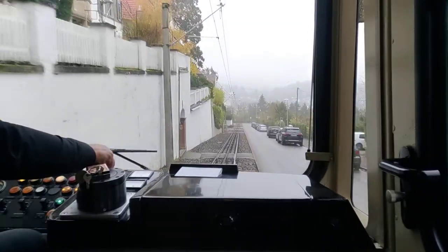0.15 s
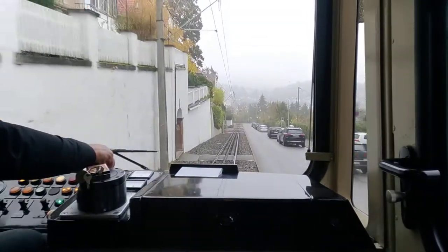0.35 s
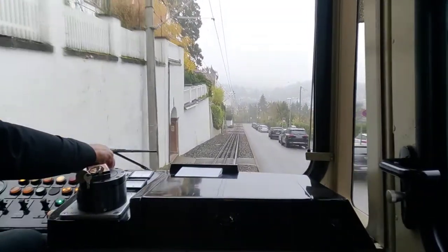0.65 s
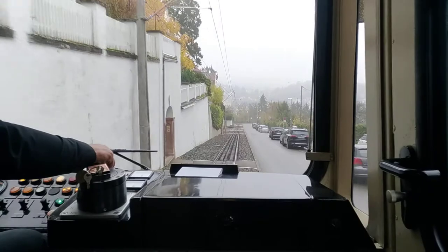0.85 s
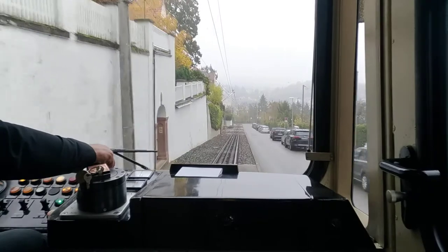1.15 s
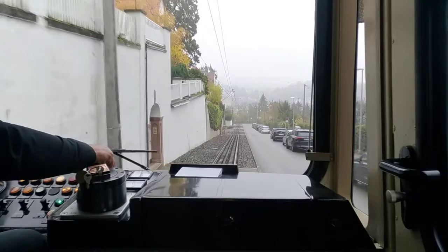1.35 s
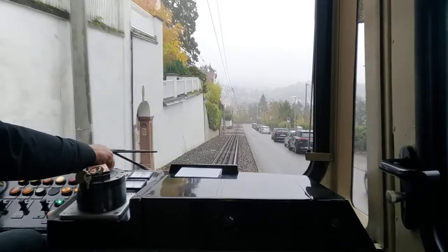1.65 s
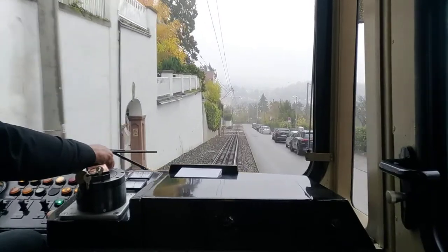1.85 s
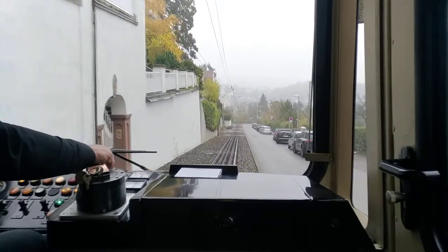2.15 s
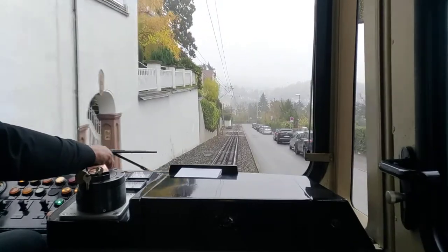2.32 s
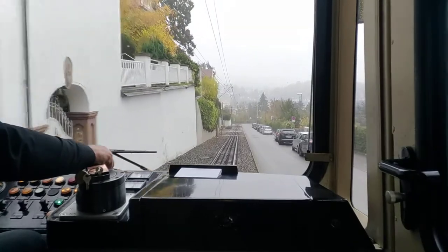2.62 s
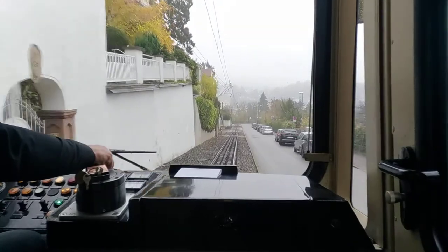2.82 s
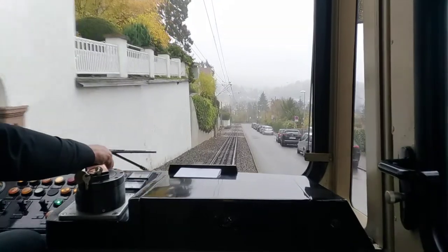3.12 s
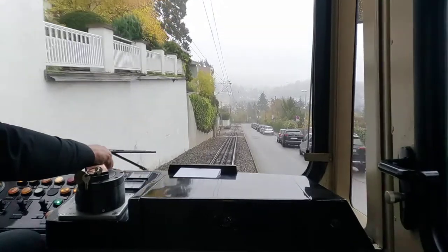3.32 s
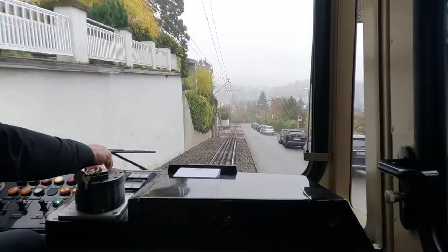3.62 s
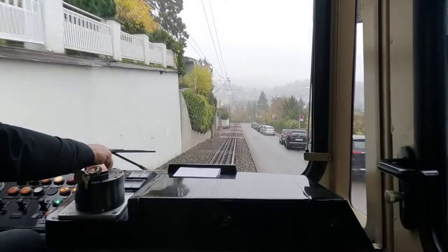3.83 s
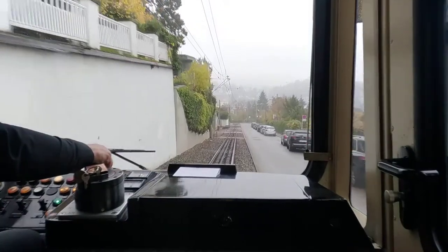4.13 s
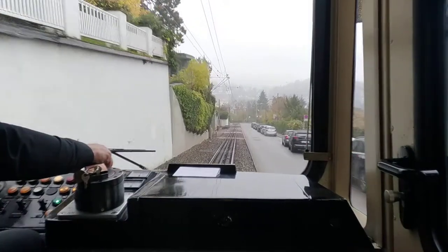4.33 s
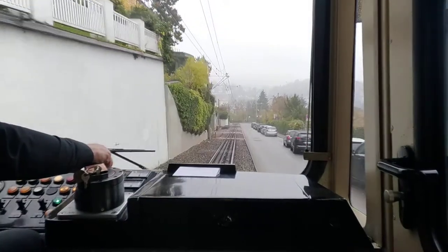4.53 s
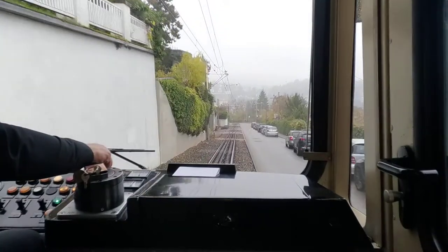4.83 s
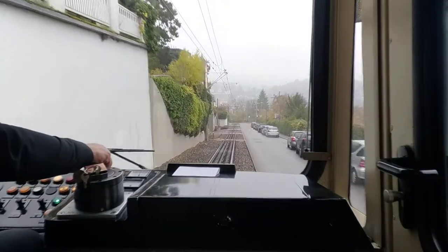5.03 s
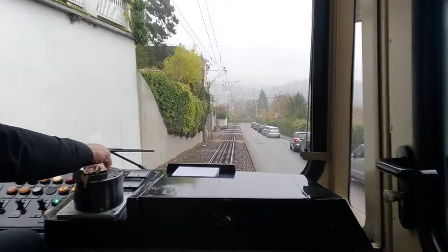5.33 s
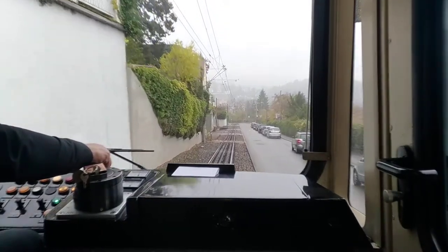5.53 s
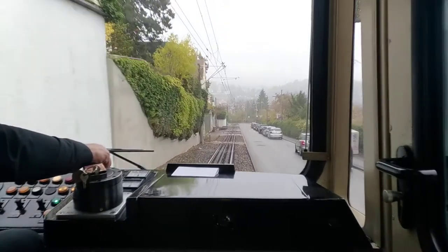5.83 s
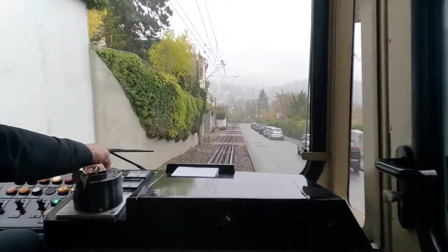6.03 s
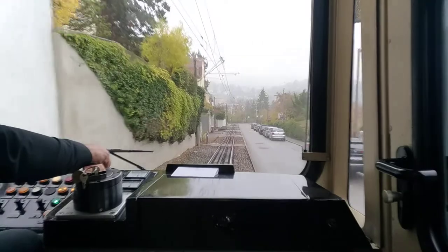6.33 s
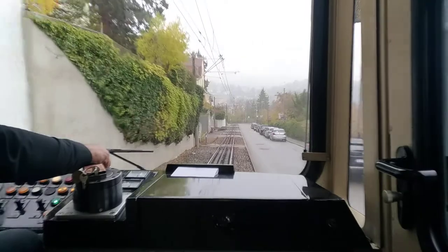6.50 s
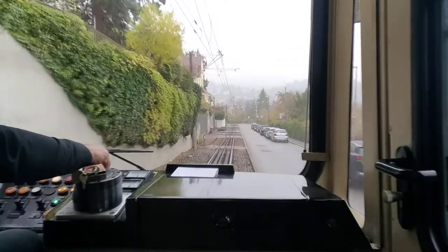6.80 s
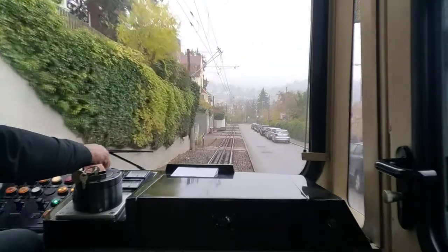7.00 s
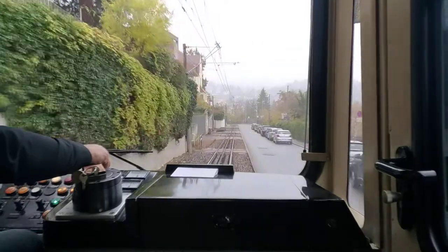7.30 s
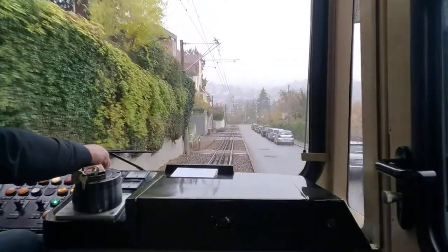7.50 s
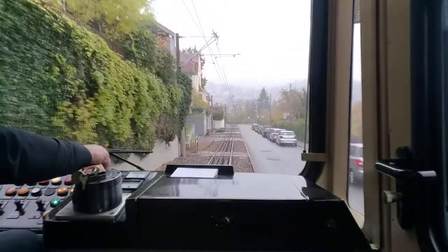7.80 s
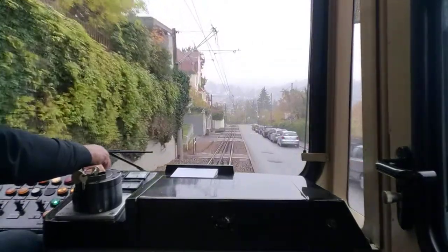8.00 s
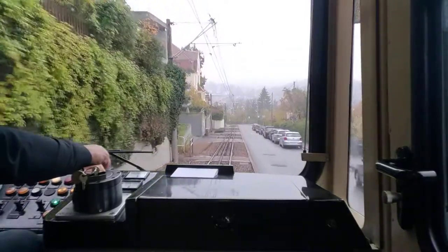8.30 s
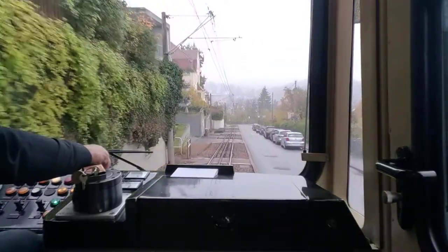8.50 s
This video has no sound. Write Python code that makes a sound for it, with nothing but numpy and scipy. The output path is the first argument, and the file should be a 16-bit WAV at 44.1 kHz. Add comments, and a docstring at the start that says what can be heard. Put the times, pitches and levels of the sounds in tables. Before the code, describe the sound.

From the start to the end, about eight and a half seconds, a rack railcar rolls at steady speed, heard from inside the driver's cab. Up front is a deep drone from the cogwheel drumming on the rack, together with a mid-pitched gear whine that keeps nearly the same pitch but wavers in loudness, with raspy, quickly throbbing overtones. The whine swells briefly around 1.2, 2.6, 4.4 and 5.6 seconds. Behind these, the cab panels hum, the floor rumbles and the track hisses faintly. Bumps make the low rumble swell for an instant near 3, 4.4, 5.2, 8 and 8.5 seconds. A flurry of light, dry, high clicks comes at about 5.8 to 6.1 seconds, and a shorter one at 7 seconds. The drone and whine continue to the end without slowing.

```python
"""A deep drone and a wavering gear whine fill the cab of a rack railcar rolling steadily downhill.
The drone is the cogwheel's teeth drumming on the rack. The whine is two gear stages, with sidebands
and throbbing overtones from their uneven wheels. Behind them the panels hum, the floor rumbles and
swells over bumps, and the track hisses past the windows. Late on come two flurries of dry clicks."""
import sys
import numpy as np
from scipy import signal
from scipy.fft import rfft, irfft, next_fast_len
from scipy.io import wavfile
from scipy.ndimage import uniform_filter1d, map_coordinates

SR = 44100
rng = np.random.default_rng(int(sys.argv[2]) if len(sys.argv) > 2 else 0)


def dump(signal):
    """Clip the signal to [-1, 1] and save it as 16-bit WAV at the path in sys.argv[1]."""
    limited = np.clip(np.atleast_2d(signal).T, -1, 1)
    pcm = np.round(limited * 32767).astype(np.int16)
    wavfile.write(sys.argv[1], SR, pcm)


N = 381553

# EQ shapes of the noise beds, levels relative: freq_hz, left_db, right_db
RUMBLE_EQ = [(60, -84, -89), (82, -59.5, -55), (95, -51.5, -50), (104, -45.5, -45.5), (114, -46.5, -47.5),
             (126.5, -41, -39.5), (139, -43.5, -44), (148, -49, -50.5), (169, -54.5, -53.5),
             (197, -59.5, -57), (257, -60.5, -57.5), (378, -68.5, -66.5), (700, -120, -120)]
THUD_EQ = [(20, -69, -70), (32.8, -54, -52), (45.2, -51, -53), (57.5, -34.5, -31.5), (73.4, -39, -39),
           (91.5, -40.5, -39.5), (131, -96.5, -101)]
ROAR_EQ = [(120, -120, -120), (199, -64.5, -68.5), (363, -62, -62), (610, -65.5, -64.5),
           (706, -63.5, -62.5), (731, -69, -62.5), (803, -58.5, -55.5), (858, -61, -56.5),
           (900, -64.5, -62), (925, -65, -60), (1000, -71.5, -67), (1130, -69, -67), (1190, -72, -68),
           (1350, -70, -68), (1590, -71.5, -67.5), (1710, -76.5, -74.5), (1790, -76, -73), (2204, -93, -90),
           (4030, -120, -120)]
HISS_EQ = [(1190, -120, -120), (2040, -79, -82.5), (2500, -81.5, -81.5), (2960, -83.5, -89),
           (3580, -83.5, -86), (3980, -86, -91), (4700, -89, -83.5), (5070, -89.5, -88.5),
           (6100, -92, -87.5), (7050, -94, -89), (8200, -94.5, -86.5), (8800, -100, -93.5),
           (9560, -106, -106), (11000, -130, -130)]
AIR_EQ = [(7000, -130, -130), (8900, -103, -110), (9700, -104, -109), (11400, -103, -109),
          (12000, -110, -112), (12800, -116, -116)]
# how alike the two sides of a bed are: freq_hz, correlation
STEREO_LIKENESS = [(60, 0.98), (150, 1), (240, 0.92), (370, 0.51), (590, 0.81), (930, 0.16), (1470, -0.75),
                   (2300, 0.34), (3600, -0.056)]
# track noise, higher beside bare walls: time_s, hiss_db, air_db
TRACK_FADERS = [(0.0, -44.5, -72), (.15, -45, -72), (.4, -46, -75), (1.4, -46.5, -72), (1.64, -49, -81),
                (1.82, -49.5, -78), (1.92, -47.5, -65), (2.25, -48, -71), (2.6, -47.5, -78),
                (2.9, -49, -75), (3.1, -47, -69), (3.36, -49.5, -78), (3.48, -47, -64), (3.75, -46.5, -65),
                (3.9, -47, -73), (4.2, -48.5, -72), (4.33, -46.5, -70), (4.5, -46, -72), (4.75, -48.5, -74),
                (5.2, -47.5, -77), (5.55, -49.5, -74), (5.88, -46.5, -66), (6.22, -49, -75),
                (6.5, -47.5, -72), (6.8, -49.5, -75), (7.05, -47.5, -69), (7.32, -49.5, -80),
                (7.8, -48, -70), (8.2, -49, -74), (8.64, -49, -72)]
# low thud of the body: time_s, level_db
THUD_FADER = [(0, -36.5), (.9, -32.5), (1.9, -36), (2.75, -33.5), (3.3, -34.5), (4.2, -36), (4.85, -38),
              (5.13, -31), (5.7, -37.5), (6, -34.5), (6.9, -37.5), (7.5, -32.5), (7.9, -42), (8.1, -36),
              (8.65, -44)]
# rumble swelling as the cogwheel turns: swells_per_turn, depth_db, phase_rad
COG_SWELLS = [(1, 0.3, -3), (2, 2.5, 3), (3, 0.3, 0), (4, 0.5, -0.1)]
# bumps in the track: time_s, swell_db
TRACK_BUMPS = [(.12, 0.5), (1.81, 4), (3.08, 7), (3.97, 4.5), (4.41, 7.5), (5.23, 10), (5.67, 1.5),
               (6.94, 1), (8.0, 6), (8.05, 6), (8.56, 13)]
# steady cab hums: pitch_hz, left_db, right_db, left_lead_rad
CAB_HUMS = [(68.3, -50, -51.5, 0.003), (121.6, -42, -38, 0.0016), (129.5, -36, -35.5, 0.0017),
            (183, -47, -46.5, 0.0033), (250.3, -46, -41, 0.0032), (464.6, -47, -52, 0.1),
            (691, -48.5, -58, 0.1), (1405, -61.5, -60.5, 0.1), (1597, -50.5, -57.5, 0.1)]
# dry clicks: start_s, left_db, right_db
CLICKS = [(5.8384, -44, -34), (5.8462, -36, -43), (5.8522, -34, -42), (5.9012, -39, -42),
          (5.9570, -40, -46), (6.0125, -37, -44), (6.0195, -38, -43), (6.0555, -34, -46),
          (6.9770, -39, -43), (7.0240, -38, -39), (7.0318, -36, -41), (7.0378, -33, -37)]

# pitch of the main gear mesh: time_s, pitch_hz
MESH_PITCH = [(0, 815.6), (.25, 816.5), (.7, 814.8), (2.75, 814.7), (3.05, 813.3), (3.9, 814.5),
              (5.4, 813.9), (5.68, 812.2), (6.0, 814.2), (6.6, 814.4), (7.0, 812.4), (8.15, 815.1),
              (8.65, 814)]
# main mesh and its second harmonic: time_s, left_db, right_db, second_db
MESH_FADERS = [(0.04, -33, -32, -42), (0.2, -31, -42, -41), (0.36, -27.5, -40, -37.5),
               (0.52, -30, -30, -42.5), (0.68, -30.5, -46, -44.5), (0.84, -30.5, -31, -47),
               (1.0, -41, -32.5, -45.5), (1.16, -29, -19, -45), (1.32, -57, -37.5, -40),
               (1.48, -27.5, -28.5, -45), (1.64, -31, -29.5, -49.5), (1.8, -31, -30, -50),
               (1.96, -29, -31.5, -41.5), (2.12, -27, -30, -54), (2.28, -27.5, -31, -47.5),
               (2.44, -30.5, -32, -42.5), (2.6, -25, -24, -47.5), (2.76, -29, -38, -53.5),
               (2.92, -29.5, -32.5, -44), (3.08, -33, -34, -42), (3.24, -30, -30, -51),
               (3.4, -31.5, -29.5, -56.5), (3.56, -34, -32, -48), (3.72, -31, -32, -53.5),
               (3.88, -27, -29, -48), (4.04, -43, -54, -45), (4.2, -30.5, -30, -45),
               (4.36, -28, -23.5, -39.5), (4.52, -37, -42, -50.5), (4.68, -39, -25.5, -46),
               (4.84, -34, -34, -41), (5.0, -35, -35, -45.5), (5.16, -31, -34, -47.5),
               (5.32, -41, -46, -51.5), (5.48, -38, -40, -46.5), (5.64, -26.5, -24, -38.5),
               (5.8, -36, -35, -44), (5.96, -42, -42, -46.5), (6.12, -34, -34.0, -49.5),
               (6.28, -28, -24.5, -45.5), (6.44, -30, -28, -47.5), (6.6, -31, -27.5, -51.5),
               (6.76, -39, -36, -58), (6.92, -32, -29.5, -41), (7.08, -29, -27.5, -42),
               (7.24, -37, -37, -54), (7.4, -31, -34, -41.5), (7.56, -33, -31, -52), (7.72, -34, -29, -47),
               (7.88, -41, -29, -42), (8.04, -31, -30.5, -45.5), (8.2, -36, -33.5, -45),
               (8.36, -27, -29.5, -45), (8.52, -42, -30, -52)]
# stereo phase of the whine: time_s, left_lead_rad
MESH_LEAD = [(0, -0.9), (.8, 0.28), (1.6, -0.089), (5.15, 0.067), (5.4, 1.5), (8.65, 1.23)]
# sidebands around the mesh: offset_hz, left_db, right_db, left_lead_rad
MESH_SIDEBANDS = [(-161.4, -54, -48, 2.6), (-142.5, -53, -45, 0.5), (-111, -59.5, -43.5, 1.5),
                  (-71.5, -53.5, -60, 0.5), (-53.5, -46, -54, 1.5), (-37.5, -41.5, -48.5, 1.2),
                  (-20, -46.5, -42.5, 4.5), (-10, -46, -36.5, 0.3), (11.5, -42, -37.5, 3),
                  (34, -52.5, -46, -1.5), (52, -57, -42, 0), (77, -49, -54.5, -1.3),
                  (110, -51.5, -41.5, -0.5), (143, -47, -47.5, -0.4), (41.5, -43.5, -51.5, -0.3)]
# small gear's partials: harmonic, left_db, right_db, left_lead_rad
SMALL_GEAR_PARTIALS = [(1, -31, -34.5, 1.2), (2, -45, -51.5, 4), (3, -45.5, -45.5, 0), (4, -45, -45.5, 1),
                       (5, -55, -41, 1.5), (6, -45, -52.5, -0.5), (7, -56, -55.5, -1),
                       (8, -56, -55.5, -1.5), (9, -52.5, -46.5, 4), (10, -61, -57, -11)]
# mesh overtones, levels relative: harmonic, tone_left_db, tone_right_db, rasp_left_db, rasp_right_db
MESH_OVERTONES = [(2, -10.5, -12, -6.5, -2.5), (3, -18.5, -20.5, -16.5, -16.5), (4, -30, -29.5, -26, -23.5),
                  (5, -31, -40, -31, -27), (6, -38, -32, -31, -29), (7, -44.5, -43, -32.5, -26.5),
                  (8, -45.5, -35, -30.5, -29.5)]
# contours that swell two overtones about their mean: time_s, third_db, fourth_db
OVERTONE_CONTOURS = [(0.049, -58.5, -65), (0.35, -60, -64), (0.65, -57.5, -67.5), (0.95, -60, -63),
                     (1.25, -55.5, -61.5), (1.55, -57, -66.5), (1.85, -59, -67), (2.15, -58, -71),
                     (2.45, -61, -65.5), (2.751, -59, -68.5), (3.05, -60.5, -65.5), (3.35, -60.5, -66),
                     (3.65, -61, -70), (3.95, -57, -69), (4.25, -57, -60.5), (4.55, -60.5, -66),
                     (4.85, -56, -65.5), (5.15, -59.5, -64), (5.45, -59, -66), (5.75, -59.5, -65),
                     (6.05, -57, -67), (6.35, -57.5, -66.5), (6.65, -57, -67), (6.95, -57.5, -66),
                     (7.25, -57, -65.5), (7.549, -58.5, -64.5), (7.85, -59, -67), (8.15, -59.5, -66.5),
                     (8.45, -59.5, -66.5)]

# cab boom on the third harmonic of the rack teeth: time_s, level_db
DRONE_FADER = [(0.0, -20), (0.88, -22.5), (1.72, -22.5), (1.88, -27.5), (2.12, -22), (2.88, -23.5),
               (3.0, -22), (3.6, -20), (3.76, -22.5), (4.04, -19.5), (4.16, -24.5), (4.64, -22.5),
               (4.96, -27), (5.32, -23), (6.04, -22.5), (6.28, -26), (6.48, -23), (8.64, -21)]
# low tooth harmonics and the mesh-plus-drone sum tone: time_s, first_db, second_db, fourth_db, sum_db
TOOTH_FADERS = [(0.1, -41, -28.5, -36, -51), (0.45, -35, -30, -53, -49), (0.8, -40, -36, -38.5, -47.5),
                (1.15, -48, -38, -32.5, -36.5), (1.5, -35, -29, -44, -50), (1.85, -50, -35, -37, -45.5),
                (2.2, -35, -38, -43, -43.5), (2.55, -41, -35, -40.5, -49), (2.9, -42, -33.5, -40, -46),
                (3.25, -41, -39, -45, -47), (3.6, -40, -32, -41, -47), (3.95, -35, -30.5, -47, -45),
                (4.3, -37, -38, -41, -55), (4.65, -43, -26.5, -52, -53), (5.0, -38, -40, -56, -54),
                (5.35, -37, -28, -46, -57), (5.7, -37, -36.5, -41.5, -48.5), (6.05, -37, -28, -35, -48),
                (6.4, -34, -38, -57, -44), (6.75, -34, -31, -48, -54.5), (7.1, -40, -42, -42, -42),
                (7.45, -33, -27, -41, -47.5), (7.8, -41, -33, -39, -48), (8.15, -31, -28, -44, -52),
                (8.5, -38, -30.5, -46, -51.5)]
# placing of the low tooth harmonics: harmonic, left_minus_right_db, left_lead_rad
LOW_TOOTH_PANS = [(1, -1.5, -0.49), (2, -1.5, 0.074), (4, 0, -0.067)]
# high tooth partials: harmonic, left_db, right_db, left_lead_rad
HIGH_TOOTH_PARTIALS = [(5, -48, -45, -1.6), (6, -51.5, -43, -0.94)]

MESH_HZ, RASP_HZ, DRONE_HZ = 814, 811.5, 161.18  # at cruising speed
SMALL_TEETH, BIG_TEETH, COG_TEETH = 14, 80, 23
RUMBLE_DB, ROAR_DB, OVERTONE_DB = -28, -30.5, -36  # base levels, before swells
ROAR_FOLLOWS, OVERTONE_FOLLOWS = 0.6, 0.37  # dB for each dB of hiss


def amp(db):
    """Decibels to gain."""
    return 10 ** (np.asarray(db) / 20)


def unit(x):
    """Normalise to rms 1."""
    return x / np.sqrt(np.mean(np.abs(x) ** 2) + 1e-20)


def along(points, hz):
    """Each column after the frequency, read on a log axis."""
    freqs, *cols = np.transpose(points)
    return np.array([np.interp(np.log(hz + 1), np.log(freqs + 1), c) for c in cols])


def curves(rows):
    """One value per sample for each column after the time."""
    times, *cols = np.transpose(rows)
    return [np.interp(np.arange(N) / SR, times, c) for c in cols]


def wobble(rate):
    """A random drift, rate knots a second."""
    knots = rng.standard_normal(int(N * rate / SR) + 4)
    return map_coordinates(knots, [np.arange(N) * rate / SR], order=1)


def phase_of(hz):
    """Phase in radians of a moving pitch."""
    return 2 * np.pi * np.cumsum(hz) / SR


def filtered(x, response):
    """EQ x with a gain given as a function of frequency."""
    size = next_fast_len(N + 8192)
    return irfft(rfft(x, size) * response(np.fft.rfftfreq(size, 1 / SR)), size)[..., :N]


def tone(phase, left_db, right_db, lead, rough, rate):
    """A stereo tone, left ahead by lead radians; its rough share smears into noise about rate Hz wide."""
    smear = np.sqrt(rough * 0.53) * (wobble(rate) + 1j * wobble(rate))
    wave = (np.sqrt(1 - rough) + smear) * np.exp(1j * (phase + rng.uniform(0, 2 * np.pi)))
    left = (wave * np.exp(1j * lead)).real
    return np.sqrt(2) * np.array([amp(left_db) * left, amp(right_db) * wave.real])


def noise_bed(eq, patchy_db):
    """Stereo noise of rms 1 with patches of random gain; the bass sits in the centre."""
    def mid_side_gains(hz):
        angle = np.arccos(along(STEREO_LIKENESS, hz)[0]) / 2
        return np.array([np.cos(angle), np.sin(angle)])

    grains = signal.stft(rng.standard_normal((2, N)), nperseg=1024)[2]
    patches = uniform_filter1d(uniform_filter1d(rng.standard_normal(grains.shape[1:]), 8, 0), 8, 1)
    pair = signal.istft(grains * amp(patchy_db * unit(patches)), nperseg=1024)[1][:, :N]
    mid, side = filtered(pair, mid_side_gains)
    return unit(filtered(np.array([mid + side, mid - side]), lambda hz: amp(along(eq, hz))))


def tooth_phase():
    """Phase of the teeth meeting the rack, in step with the gears."""
    hz, = curves(MESH_PITCH)
    return phase_of(DRONE_HZ * hz / hz.mean()) / 3


def track_hiss():
    """The track hisses past, fluttering at the shaft rate, with patchy air on top."""
    hiss_db, air_db = curves(TRACK_FADERS)
    flutter_db = 0.25 * np.sin(2 * np.pi * MESH_HZ / BIG_TEETH * np.arange(N) / SR)
    hiss = amp(hiss_db + flutter_db + 0.27 * wobble(12)) * noise_bed(HISS_EQ, patchy_db=1.08)
    air = amp(air_db + 1.5 * wobble(9)) * noise_bed(AIR_EQ, patchy_db=4.0)
    return hiss + air


def clicks(pitch_hz=(5200, 8300), width_hz=1100, rise_s=0.00015, top_hz=12000):
    """Dry clicks, each a quickly damped ring, lower on the left than on the right."""
    out, t = np.zeros((2, N)), np.arange(SR // 200) / SR
    envelope = (1 - np.exp(-t / rise_s)) * np.exp(-np.pi * width_hz * t)
    ring = envelope * np.sin(2 * np.pi * np.outer(pitch_hz, t))
    for start_s, *db in CLICKS:
        start = round((start_s - rise_s) * SR)
        out[:, start:start + len(t)] += amp(db)[:, None] * ring / ring.max()
    return filtered(out, lambda hz: 1 / (1 + (hz / top_hz) ** 6))


def panel_hum():
    """Panels and auxiliaries hum at steady pitches."""
    return sum(tone(phase_of(np.full(N, hz)), *stereo, rough=0.52, rate=4.5) for hz, *stereo in CAB_HUMS)


def body_rumble(bump_half_width_s=0.035, bump_top_hz=165):
    """The body rumbles, thuds and roars; the turning cogwheel and track bumps swell the low end."""
    t, cog = np.arange(N) / SR, tooth_phase() / COG_TEETH
    cog_db = sum(db * np.cos(k * cog + phase) for k, db, phase in COG_SWELLS)
    bump_db = sum(db * np.exp(-((t - s) / bump_half_width_s) ** 2) for s, db in TRACK_BUMPS)
    rumble = amp(RUMBLE_DB + cog_db + 0.21 * wobble(21)) * noise_bed(RUMBLE_EQ, patchy_db=0)
    lows = filtered(rumble, lambda hz: 1 / (1 + (hz / bump_top_hz) ** 12))
    rumble += (amp(bump_db) - 1) * lows
    thud = amp(curves(THUD_FADER)[0] + 0.91 * wobble(5.3)) * noise_bed(THUD_EQ, patchy_db=-0.5)
    hiss_db, _ = curves(TRACK_FADERS)
    roar_db = ROAR_DB + ROAR_FOLLOWS * (hiss_db - hiss_db.mean()) + 0.05 * bump_db
    roar = amp(roar_db + wobble(8)) * noise_bed(ROAR_EQ, patchy_db=0.68)
    return rumble + thud + roar


def gear_overtones(mesh, shaft, rasp):
    """Uneven wheels make the raspy overtones throb once a shaft turn; takes three phases in radians."""
    backlash = 0.33 * wobble(10)  # shakes the phase, more so in higher overtones
    hiss_db, _ = curves(TRACK_FADERS)
    throb = amp(OVERTONE_DB + OVERTONE_FOLLOWS * (hiss_db - hiss_db.mean()) + 0.79 * np.sin(shaft))
    contours = curves(MESH_FADERS)[-1], *curves(OVERTONE_CONTOURS)
    swell_db = {k: depth * (db - db.mean()) for k, db, depth in zip((2, 3, 4), contours, (0.36, 1.2, 1.2))}
    out = np.zeros((2, N))
    for k, *levels in MESH_OVERTONES:
        for side in (0, 1):  # each side hears its own mix of both bogies
            tone_db, rasp_db = (db + swell_db.get(k, 0) for db in levels[side::2])
            tone_db += 0.5 * wobble(4.8)
            out[side] += tone(k * (mesh + backlash), tone_db, tone_db, 0, rough=0.6, rate=13 * k)[0]
            out[side] += tone(k * rasp, rasp_db, rasp_db, 0, rough=0.99, rate=40 * k)[0]
    return throb * out


def gear_whine():
    """Two gear stages on one shaft sing at their tooth rates; uneven wheels add sidebands."""
    *mesh_db, second_db = curves(MESH_FADERS)
    (hz,), (lead,) = curves(MESH_PITCH), curves(MESH_LEAD)
    speed = hz / MESH_HZ
    mesh, shaft, rasp = phase_of(hz), phase_of(hz / BIG_TEETH), phase_of(speed * RASP_HZ)
    left_db, right_db = (db + 0.77 * wobble(12) for db in mesh_db)
    whine = tone(mesh, left_db, right_db, lead + 0.099 * wobble(1.9), rough=0.022, rate=12)
    # the second harmonic sits to the right and wavers in pitch
    left_db, right_db = (second_db + pan_db + 1.3 * wobble(11) for pan_db in (-3, 3))
    wavering = 2 * rasp + 1.7 * wobble(40)
    whine += tone(wavering, left_db, right_db, lead=1.2 + 0.3 * wobble(2.9), rough=0.38, rate=55)
    for offset_hz, *stereo in MESH_SIDEBANDS:
        whine += tone(phase_of(speed * (MESH_HZ + offset_hz)), *stereo, rough=0.83, rate=11)
    for k, *stereo in SMALL_GEAR_PARTIALS:
        whine += tone(k * SMALL_TEETH * shaft, *stereo, rough=0.33, rate=3.5 + 1.2 * k)
    sum_db = curves(TOOTH_FADERS)[-1]  # sum tone of mesh and drone
    whine += tone(mesh + 3 * tooth_phase(), sum_db - 12, sum_db + 6.5, lead=1.7, rough=0.2, rate=6)
    return whine + gear_overtones(mesh, shaft, rasp)


def rack_drone():
    """The cogwheel's teeth drum on the rack; the cab booms on their third harmonic."""
    tooth = tooth_phase()
    boom_db = curves(DRONE_FADER)[0] + wobble(7) + 0.33 * wobble(19)
    drone = tone(3 * tooth, boom_db - 0.9, boom_db + 1, lead=0.21, rough=0.033, rate=22)
    for (k, pan_db, lead), db in zip(LOW_TOOTH_PANS, curves(TOOTH_FADERS)):
        drone += tone(k * tooth, db + pan_db / 2, db - pan_db / 2, lead, rough=0.28, rate=6)
    for k, *stereo in HIGH_TOOTH_PARTIALS:
        drone += tone(k * tooth, *stereo, rough=0.51, rate=3)
    return drone


def scene():
    """Drone and whine up front, the cab and track behind."""
    return rack_drone() + gear_whine() + panel_hum() + body_rumble() + track_hiss() + clicks()


def record(dry, ceiling=0.5, top_hz=12800):
    """The input stage rounds off the tallest peaks; a steep low-pass trims the top."""
    soft = dry / (1 + np.abs(dry / ceiling) ** 6) ** (1 / 6)
    return signal.sosfiltfilt(signal.ellip(10, .1, 60, top_hz, fs=SR, output="sos"), soft)


dry = scene()
out = record(dry)
dump(out)
```